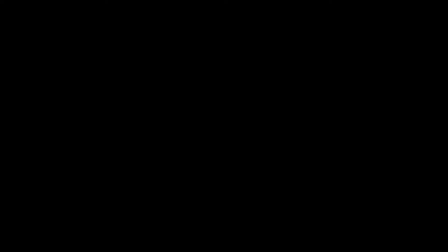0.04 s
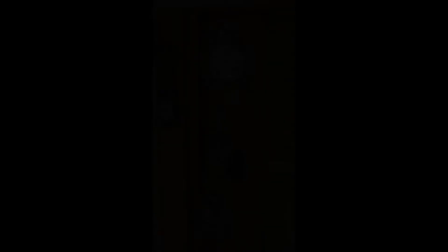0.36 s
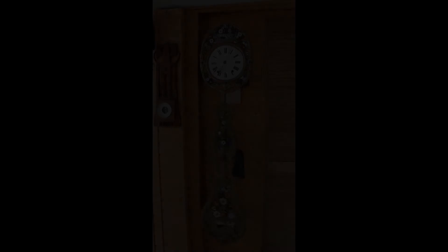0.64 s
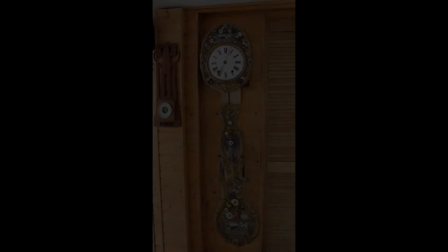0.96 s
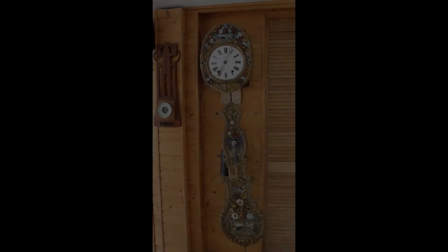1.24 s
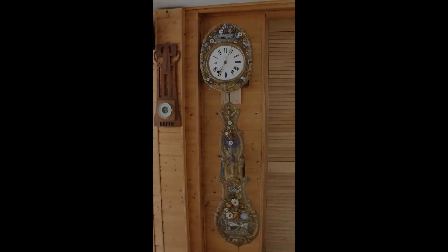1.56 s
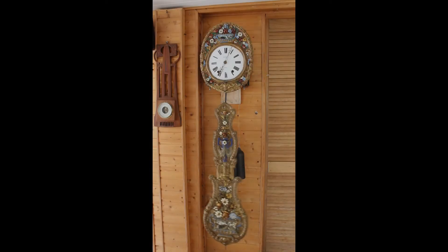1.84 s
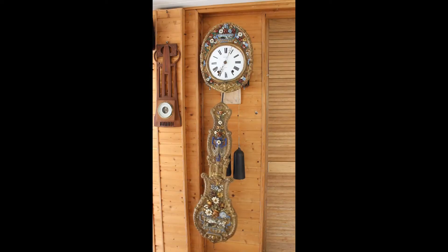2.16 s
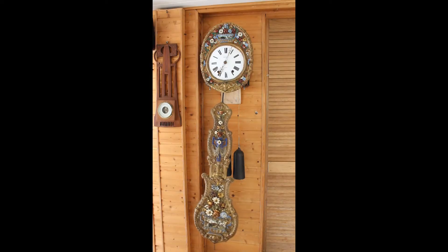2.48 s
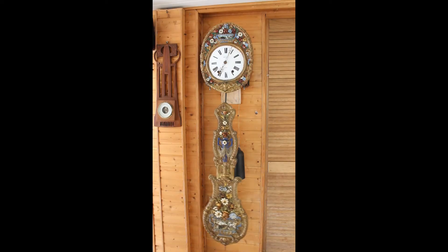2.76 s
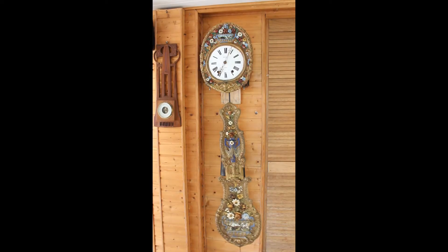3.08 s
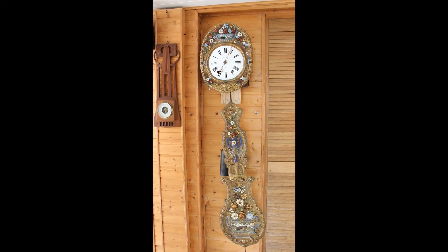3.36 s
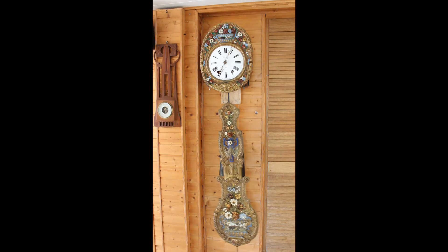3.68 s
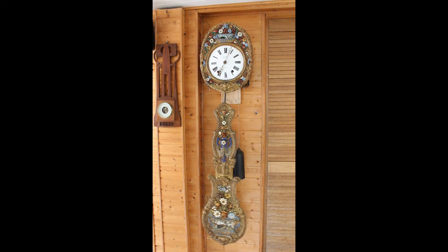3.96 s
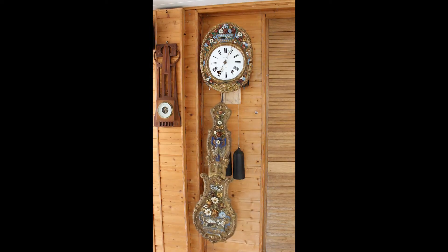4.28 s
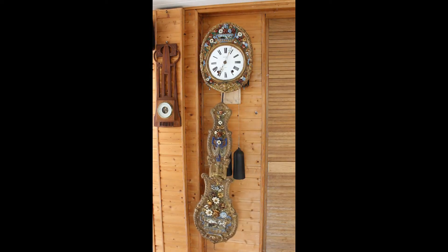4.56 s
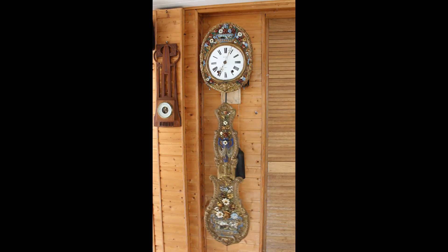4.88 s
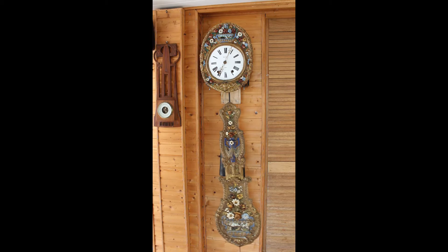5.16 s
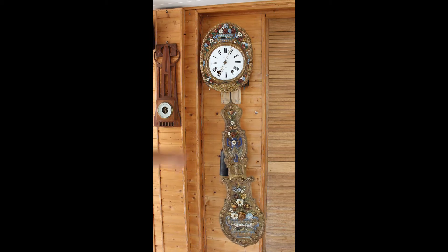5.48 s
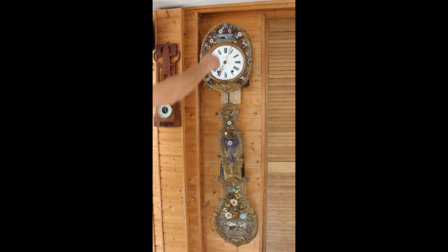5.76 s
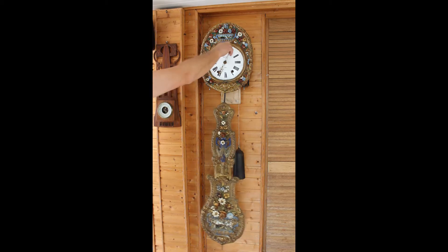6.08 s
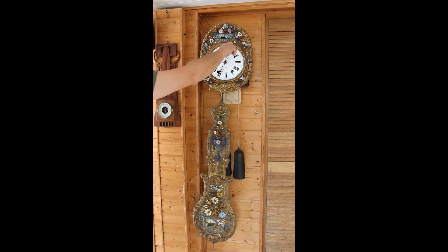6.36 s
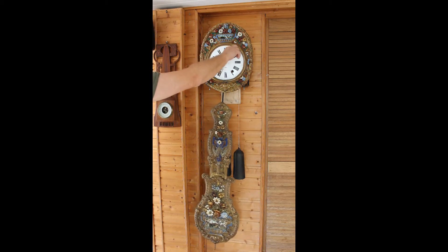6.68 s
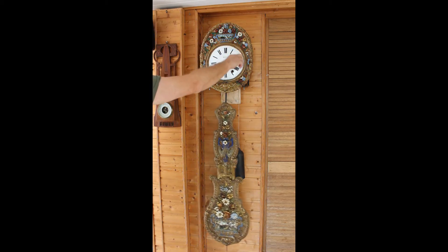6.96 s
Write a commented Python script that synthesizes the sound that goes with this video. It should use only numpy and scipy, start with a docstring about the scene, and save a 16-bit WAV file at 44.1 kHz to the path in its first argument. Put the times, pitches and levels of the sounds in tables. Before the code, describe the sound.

Slow mechanical tick-tock indoors over faint hiss, joined by footsteps on wooden boards, rustling clothes and a click of the clock's hand.

```python
"""A wood-panelled room, one microphone, far enough from a tall pendulum wall clock to hear mostly reflections.
The sound fades in on the escapement, steel landing on brass about once a second and ringing the case.
Someone walks up: floorboards knock, the floor rumbles, clothes rustle. As the steps settle they move
the minute hand, which slips with one click. A faint hiss lies under it all, the same in both ears."""
import sys
import numpy as np
from scipy import signal
from scipy.fft import rfft, irfft
from scipy.io import wavfile

SR = 44100
rng = np.random.default_rng(int(sys.argv[2]) if len(sys.argv) > 2 else 0)


def generate_wav(sig):
    """Save sig (samples, or channels by samples) to the path in sys.argv[1] as 16-bit PCM at SR."""
    pcm = np.round(np.clip(np.atleast_2d(sig).T, -1, 1) * 32767).astype(np.int16)
    wavfile.write(sys.argv[1], SR, pcm)


N = 318843
TIME = np.arange(N) / SR
AGE = np.arange(SR // 2) / SR  # seconds since a blow

# The two pallets landing in turn, each wheel tooth favouring one resonance, and the hand slipping:
# start_s, level_db, brightness_db_per_octave, favoured_hz, lift_db
TICK_BLOWS = [(2.023, -34.5, -0.35, 1735, 11.5), (4.116, -34, 0, 1720, 12), (6.200, -34.5, 0, 1914, 12)]
TOCK_BLOWS = [(0.935, -39, 0, 640, 5.4), (3.017, -38.5, 0, 430, 12.5), (5.103, -40.5, 0, 1920, 3.4),
              (7.158, -39.5, 0, 3330, 5)]
HAND_BLOWS = [(6.969, -34, 1.5, 2070, -0.5)]
# Brass and case modes that each blow wakes: pitch_hz, level_db, t60_s
TICK_RING = [(250, -7.5, 0.64), (477, -1, 0.61), (989, -2, 0.29), (1312, -1.5, 0.25), (1470, -2.5, 0.15),
             (1740, -3, 0.12), (1820, -9, 0.12), (1823, -0.5, 0.15), (1900, -4.5, 0.12), (2170, -9.5, 0.22),
             (2580, -9, .2), (2820, -11, 0.18), (3230, -9, 0.18), (4120, -9.5, 0.16), (4410, -4.5, 0.2),
             (5900, -8, 0.16), (6300, -16, 0.22), (6730, -12, 0.24), (7800, -22, 0.43), (8300, -26, 0.22),
             (8500, -16, 0.18), (9610, -20, .2), (9800, -22, .2), (12500, -22, .16), (13000, -23, .16),
             (14250, -23, .16)]
TOCK_RING = [(245, -0.5, 0.45), (430, -2.5, 0.24), (640, -6, 0.26), (852, 2.5, 0.49), (1366, -4, 0.26),
             (1874, 4, 0.087), (1914, -2, 0.13), (2180, 0, 0.18), (2260, -1.5, 0.18), (3330, -5, 0.44),
             (4570, -13, 0.25), (5530, -1, .26), (6600, -12, 0.25), (7050, -9.5, 0.31), (7600, -2.5, 0.32),
             (8800, -8.5, 0.25), (9200, -24, 0.22), (12020, -19, .2), (12100, -17, .2)]
HAND_RING = [(126, -13, 0.42), (303, 6, .25), (386, -6.5, 0.27), (865, -6, 0.18), (1396, -7, 0.18),
             (2070, -3, 0.2), (3820, -6, 0.12), (4660, -7, 0.19), (4970, -10, .2), (5120, -13, .2),
             (5500, -24, .2), (6600, -14, 0.24), (8020, -14, .2), (8200, -4.5, .22), (8380, -8, .2),
             (8700, -8, .26), (8800, -9, 0.14), (9400, -19, .2), (12160, -16, .18), (12300, -15, .16)]
# Dense clatter between the modes: frequency_hz, level_db
TICK_SPECTRUM = [(100, -23), (280, -6), (600, -2.5), (1180, -5), (1370, 3.5), (1850, 0), (2300, -8),
                 (4200, -6), (5200, -19.5), (6300, -8), (9000, -22), (11000, -27), (12350, -16),
                 (14300, -31), (15500, -33)]
TOCK_SPECTRUM = [(80, -13), (250, 4), (900, 12), (2000, 8.5), (2700, 1), (4300, 0), (6000, -10), (8600, -5),
                 (10000, -25), (15000, -25)]
HAND_SPECTRUM = [(80, -12.5), (300, 13.5), (700, 0.5), (1600, 1), (3700, -1.5), (4300, -14), (5000, -3.5),
                 (7300, -17), (8400, -9), (10000, -25), (12200, -13), (15000, -26)]
# Boards knocking underfoot: start_s, thud_hz, thud_db, clack_hz, clack_db, snap_db, room_db, rebound_ratio
BOARD_KNOCKS = [(2.837, 327, -43.5, 565, -50, -61, 6, 0), (2.965, 250, -36.5, 400, -65, -70, -8, 0.07),
                (3.004, 235, -38.5, 1000, -37.5, -51, 22, 0.5), (3.469, 278, -44.5, 600, -58, -67, -4, 0.1),
                (4.313, 446, -36, 1310, -38.5, -40, 11.5, 0.32),
                (4.574, 380, -36.5, 1250, -35, -38, 2, 0.07), (4.698, 197, -43, 740, -38.5, -53, 0.5, 0),
                (4.734, 143, -35.5, 283, -35, -70, 3, 0.45), (4.893, 295, -27.5, 560, -28.5, -43, 0, .45),
                (5.275, 477, -42.5, 1400, -38.5, -56, 1, 0), (5.392, 360, -41, 780, -44, -45.5, 16, .3),
                (5.444, 390, -49, 885, -51, -56, 10, 0), (5.782, 345, -44, 694, -45, -51.5, 4, 0)]
# A board's joint snapping: frequency_hz, level_db
SNAP_SPECTRUM = [(300, -32), (1400, -9), (2500, 14), (4100, 11.5), (6000, -4.5), (10000, -10.5),
                 (15000, -31)]
# Steps that shake the floor: start_s, level_db, t60_s
STEPS = [(2.65, -64, .5), (3.55, -56.5, 0.2), (3.76, -52, 0.5), (4.19, -50.5, 2), (4.88, -37, .33),
         (5.259, -52, 0.7), (5.71, -59, 0.5)]
# Strokes of cloth and soles: peak_s, half_length_s, level_db, centre_hz, spread_octaves
STROKES = [(2.292, 0.024, -49.5, 1460, 1.2), (2.938, 0.032, -52.5, 2000, .9),
           (3.134, 0.072, -49.5, 894, 0.98), (3.373, .017, -55.5, 2480, 1.4), (3.785, .028, -47, 490, 1.2),
           (3.839, .014, -45.5, 1500, 1.2), (3.929, 0.041, -42.5, 1020, 0.53), (4.2, 0.018, -44, 950, 1.04),
           (4.985, 0.021, -45.5, 597, 0.83), (5.277, 0.092, -51, 1040, 0.54),
           (5.638, 0.028, -53, 1410, 1.34), (5.747, 0.022, -47, 790, 1.08)]
# Noise of the floor swaying, the walker shuffling, and air and microphone: frequency_hz, level_db
RUMBLE_SPECTRUM = [(10, -13), (25, -1), (45, -5), (70, -12.5), (200, -28), (600, -80)]
SHUFFLE_SPECTRUM = [(40, -7.5), (100, -1), (400, 2), (1200, -1.5), (3000, -7), (7000, -14), (15000, -28)]
HISS_SPECTRUM = [(20, -28), (45, -2.5), (100, -8), (200, 0.5), (290, -3), (550, -6), (1300, -8),
                 (3000, -11), (9300, -18.5), (15500, -18.5)]
# Narrow band of electronic whine: frequency_hz, level_db
WHINE_SPECTRUM = [(12810, -60), (13290, -6), (13450, 0), (13610, -6), (14090, -60)]
# How long the panelled room rings: frequency_hz, t60_s
ROOM_DECAY = [(100, 0.32), (400, 0.86), (1800, 0.37), (5000, 0.52), (9000, 0.37), (15000, 0.2)]


def clockwork(blows, modes, clatter_spectrum, rise_s, ring_db, clatter_db, path_change=0.83, snap_db=-14):
    """Steel lands on brass inside the case; the microphone gets it almost wholly by reflection."""
    out, hz = np.zeros(N), np.fft.rfftfreq(len(AGE), 1 / SR)
    case_path = room(rise_s)
    strike = click(clatter_spectrum)
    tail_fade = np.minimum(8 * (1 - AGE / AGE[-1]), 1) ** 4
    for start_s, level_db, brightness, favoured_hz, lift_db in blows:
        path = case_path + path_change * room(rise_s)  # pendulum and walker change some reflections
        blow = amp(ring_db) * case_ring(modes) + amp(clatter_db) * heard(strike, path)
        short_path = room(0.0038, early_t60=0.15, late_db=-18)  # the bright first contact dies soonest
        blow += amp(snap_db) * heard(np.diff(strike), short_path)
        tilt_db = brightness * np.log2(np.maximum(hz, 200) / 2000)
        resonance_db = lift_db / (1 + ((hz - favoured_hz) / 45) ** 2)
        add(out, start_s, amp(level_db) * filtered(blow, amp(tilt_db + resonance_db)) * tail_fade)
    return out


def case_ring(modes, scatter=0.95, waver_hz=55, rise_s=0.0061, late_db=-14):
    """Each mode of brass and case swells and dies; its own reflections make it waver and linger."""
    out = np.zeros(len(AGE))
    waver_band = np.exp(-(np.fft.fftfreq(len(AGE), 1 / SR) / waver_hz) ** 2)
    for hz, level_db, t60 in modes:
        complex_noise = rng.standard_normal((2, len(AGE))).T @ [1, 1j]
        echoes = np.fft.ifft(np.fft.fft(complex_noise) * waver_band)
        waver = 1 + scatter * echoes / np.std(echoes)
        fall = np.hypot(amp(-60 * AGE / t60), amp(late_db - 60 * AGE / read(ROOM_DECAY, hz)))
        tone = (waver * np.exp(2j * np.pi * (hz * AGE + rng.random()))).real
        out += amp(level_db) * unit_blow(tone * fall * swell(rise_s))
    return unit_blow(out)


def floorboards(thud_cycles=8, clack_cycles=4, rebound_s=0.02, rebound_shrink=0.85):
    """A loaded board thuds, clacks against its joist and snaps at the joint; a loose one rebounds."""
    out = np.zeros(N)
    snap = click(SNAP_SPECTRUM)
    for start_s, thud_hz, thud_db, clack_hz, clack_db, snap_db, room_db, rebound in BOARD_KNOCKS:
        thud = mode(thud_hz, thud_cycles / thud_hz) * swell(0.0011)
        clack = np.diff(mode(clack_hz, clack_cycles / clack_hz) * swell(0.00056), prepend=0)
        parts = (thud_db, thud), (clack_db, clack), (snap_db, snap)
        for bounce in range(3):
            walls = np.zeros(len(AGE))  # five echoes off the nearest surfaces, 2-20 ms late
            walls[rng.integers(SR // 500, SR // 50, size=5)] = rng.choice([-0.5, 0.5], size=5)
            reflections = room(0.00037, early_t60=0.23, late_db=-16.5) + amp(-7) * walls
            path = (AGE == 0) + amp(room_db) * reflections  # direct sound, then the room
            blow = sum(amp(db) * heard(part, path) for db, part in parts)
            add(out, start_s, rebound ** bounce * blow)
            start_s += rebound_s * rebound_shrink ** bounce
    return out


def floor_rumble(sway_db=-67, joist_hz=82.6, boom_growth=1.8, boom_delay_s=0.0195):
    """The floor sways under the walker; each step shakes it, and a heavy one makes the joists boom."""
    shake, boom = amp(sway_db) * movement(), np.zeros(N)
    joist = unit_blow(mode(joist_hz, t60=0.25))
    heaviest_db = max(db for _, db, _ in STEPS)
    for start_s, level_db, t60 in STEPS:
        load = swell(0.01) ** 2 * amp(-60 * AGE / t60)  # the weight comes onto the foot
        add(shake, start_s, amp(level_db) * load / load.max())
        boom_db = heaviest_db + 3 + boom_growth * (level_db - heaviest_db)  # grows faster than the step
        add(boom, start_s + boom_delay_s, amp(boom_db) * joist)
    return shake * noise(RUMBLE_SPECTRUM) + boom


def brushes(grain_db=1.0):
    """Cloth and soles slide in short strokes made of many tiny slips."""
    out, hz = np.zeros(N), np.fft.rfftfreq(len(AGE), 1 / SR)
    middle_s = AGE[-1] / 2
    for peak_s, half_length_s, level_db, centre_hz, spread_octaves in STROKES:
        slips = rng.standard_normal(len(AGE)) * amp(grain_db * np.minimum(rng.exponential(1, len(AGE)), 4))
        band = np.exp(-0.25 * (np.log2((hz + 1) / centre_hz) / spread_octaves) ** 2)
        stroke = np.exp(-0.5 * ((AGE - middle_s) / half_length_s) ** 2)
        add(out, peak_s - middle_s, amp(level_db) * stroke * unit_rms(filtered(slips, band)))
    return out


def shuffle(full_stride_db=-51.5):
    """Clothes and floor rustle for as long as the walker moves."""
    return amp(full_stride_db) * movement() * noise(SHUFFLE_SPECTRUM)


def movement(stride_from_s=3.76, stride_to_s=5.19, build_db_per_s=4.5, settle_db_per_s=7.5):
    """The walk as a gain: it builds, holds at 1 in full stride and settles near the clock."""
    building_db = -build_db_per_s * np.maximum(stride_from_s - TIME, 0)
    settling_db = -settle_db_per_s * np.maximum(TIME - stride_to_s, 0)
    return amp(building_db + settling_db)


def room(rise_s, early_t60=0.2, late_db=-8):
    """Dense reflections build up, fall fast between the near panels, then linger in the room."""
    hz, t, spectrum = signal.stft(rng.choice([-1., 1.], len(AGE)), SR, nperseg=256)
    early = amp(-60 * t / early_t60)
    late = amp(late_db - 60 * t / read(ROOM_DECAY, hz)[:, None])
    tail = signal.istft(spectrum * np.hypot(early, late), SR, nperseg=256)[1][:len(AGE)] * swell(rise_s)
    return tail / np.linalg.norm(tail)


def hiss(hiss_db=-56.5, whine_db=-75):
    """Room air and microphone hiss, with a thin electronic whine."""
    return amp(hiss_db) * noise(HISS_SPECTRUM) + amp(whine_db) * noise(WHINE_SPECTRUM)


def heard(source, path):
    """A source carried along a path to the microphone, at unit strength."""
    return unit_blow(signal.fftconvolve(source, path)[:len(AGE)])


def click(spectrum):
    """The shortest causal pulse with a given spectrum."""
    log_gain = np.log(amp(read(spectrum, abs(np.fft.fftfreq(4096, 1 / SR)))))
    pulse = np.fft.ifft(np.exp(np.conj(signal.hilbert(log_gain)))).real
    return pulse[:len(pulse) // 2]


def mode(hz, t60):
    """One vibration, dying by 60 dB in t60 seconds."""
    return np.sin(2 * np.pi * hz * AGE) * np.exp(-np.log(1000) * AGE / t60)


def swell(rise_s):
    """An onset rising from 0 towards 1."""
    return 1 - np.exp(-AGE / rise_s)


def noise(spectrum):
    """Steady noise of a given spectrum, at rms 1."""
    gains = amp(read(spectrum, np.fft.rfftfreq(N, 1 / SR)))
    return unit_rms(filtered(rng.standard_normal(N), gains))


def filtered(sound, gains):
    """Applies one gain to each frequency."""
    return irfft(rfft(sound) * gains, len(sound))


def read(points, hz):
    """A table's value at hz, interpolated on a log-frequency axis."""
    table_hz, values = np.transpose(points)
    return np.interp(np.log(hz + 1), np.log(table_hz + 1), values)


def add(mix, start_s, sound):
    """Lays a sound into the mix."""
    part = mix[max(round(start_s * SR), 0):][:len(sound)]
    part += sound[:len(part)]


def amp(db):
    """Decibels to gain."""
    return 10 ** (np.asarray(db) / 20)


def unit_rms(x):
    """Scales to rms 1."""
    return x / np.sqrt(np.mean(x ** 2) + 1e-20)


def unit_blow(x):
    """Scales a blow to the energy of 25 ms at rms 1."""
    return x / np.sqrt(np.sum(x ** 2) / (0.025 * SR) + 1e-20)


def scene():
    """Clock, walker and hiss at one microphone, fed to both channels."""
    clock = clockwork(TICK_BLOWS, TICK_RING, TICK_SPECTRUM, rise_s=0.012, ring_db=-2, clatter_db=-3)
    clock += clockwork(TOCK_BLOWS, TOCK_RING, TOCK_SPECTRUM, rise_s=0.022, ring_db=-2, clatter_db=-2)
    clock += clockwork(HAND_BLOWS, HAND_RING, HAND_SPECTRUM, rise_s=0.0046, ring_db=0, clatter_db=1)
    walker = shuffle() + floorboards() + floor_rumble() + brushes()
    return np.tile(clock + walker + hiss(), (2, 1))


def record(dry, bias=0.0011, fade_start_s=0.21, fade_length_s=1.69, cutoff_hz=15830):
    """The microphone's converter adds a steady bias; the level fades in and the top treble is cut."""
    fade = np.clip((TIME - fade_start_s) / fade_length_s, 0, 1) ** 1.28
    low_pass = signal.firwin(1023, cutoff_hz, window=("kaiser", 9), fs=SR)
    return signal.oaconvolve((dry + bias) * fade, low_pass[None], "same")


dry = scene()
out = record(dry)
generate_wav(out)
```